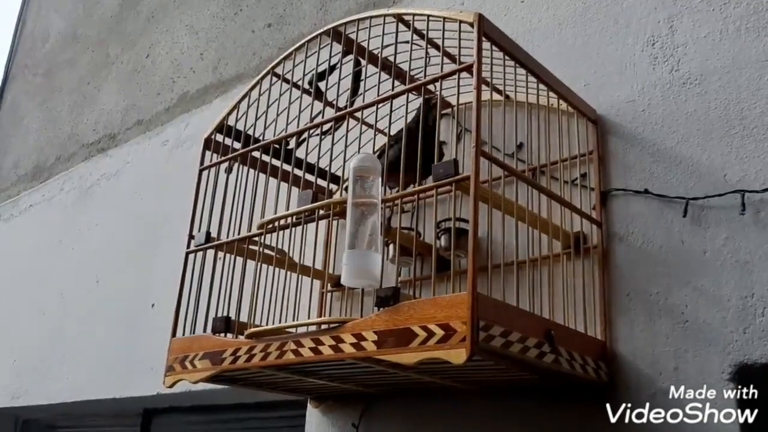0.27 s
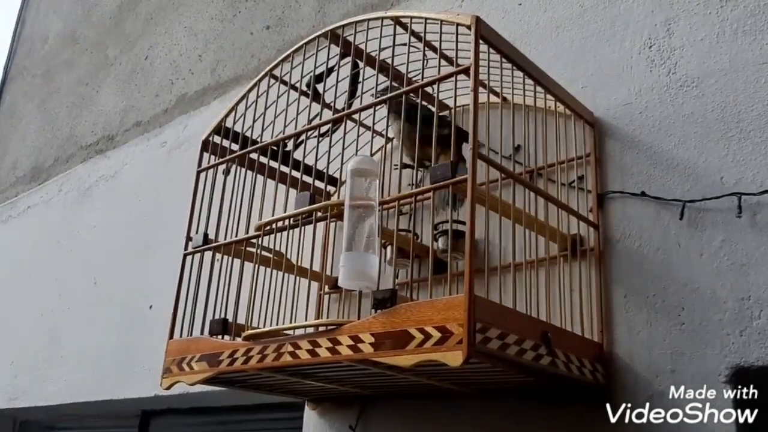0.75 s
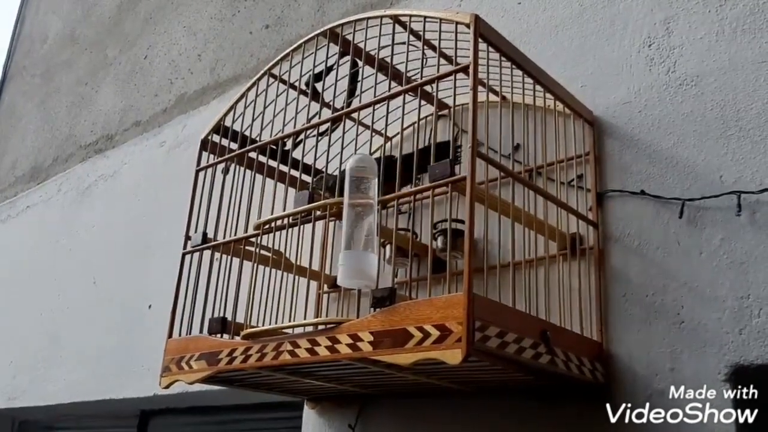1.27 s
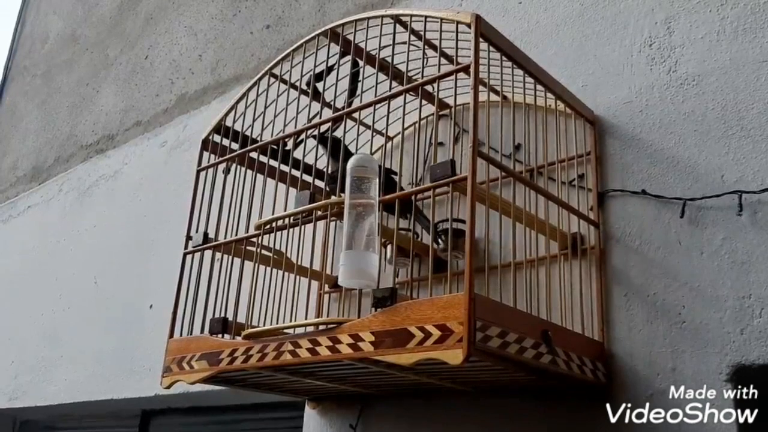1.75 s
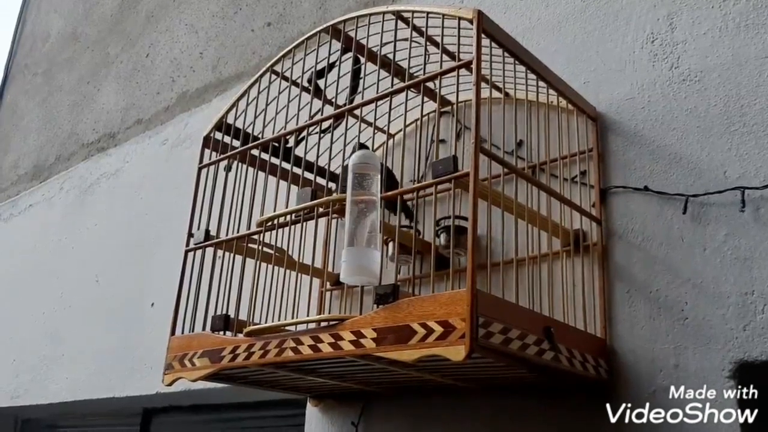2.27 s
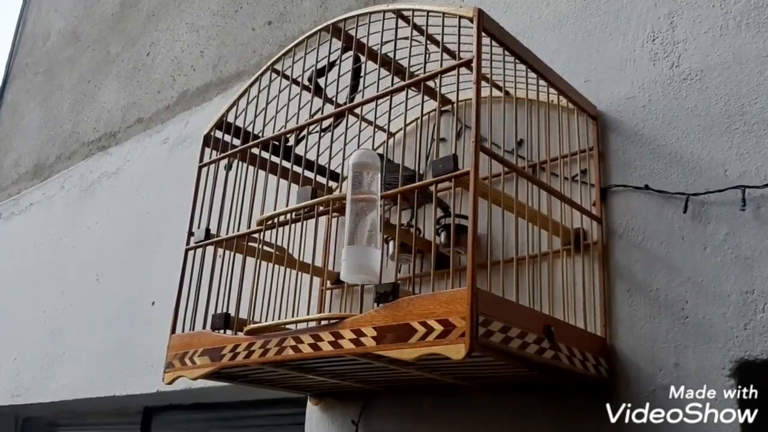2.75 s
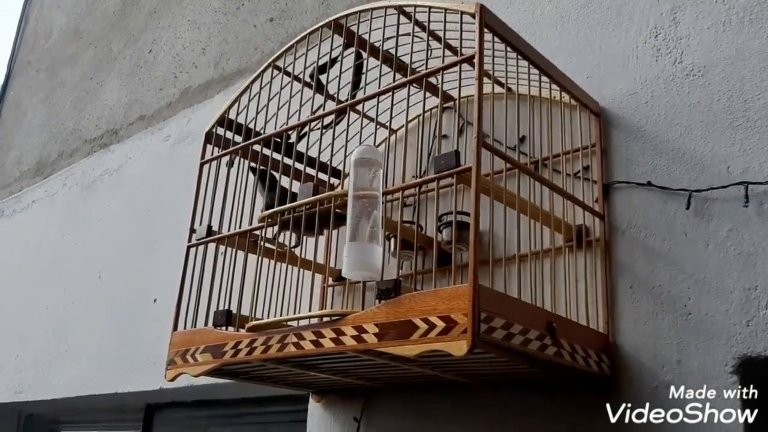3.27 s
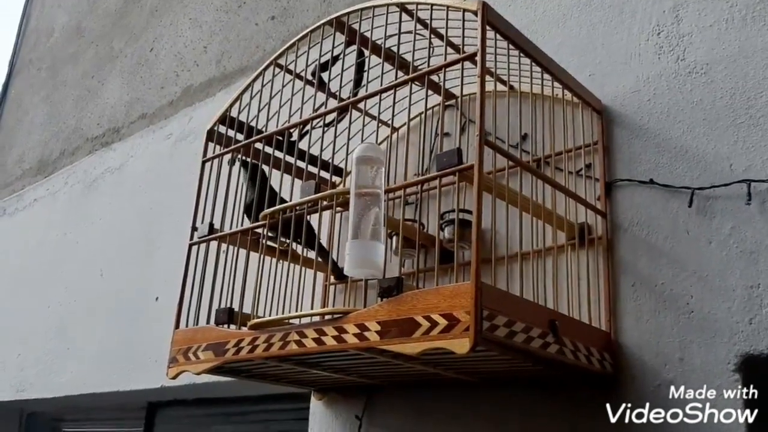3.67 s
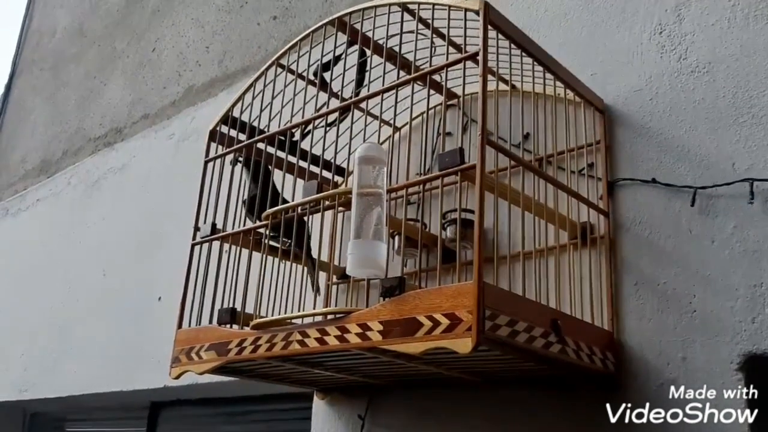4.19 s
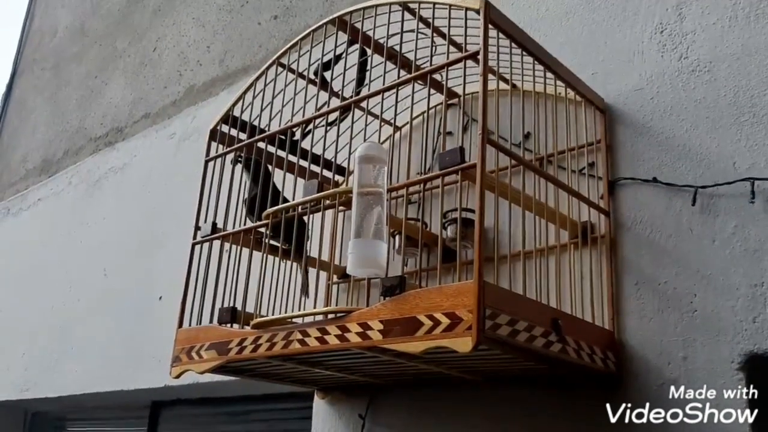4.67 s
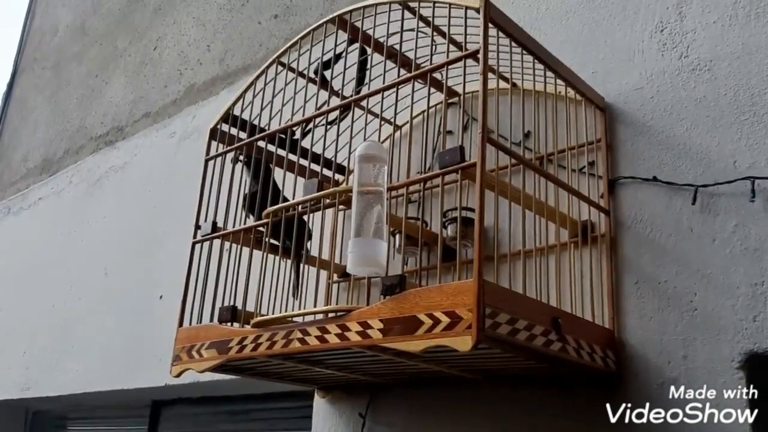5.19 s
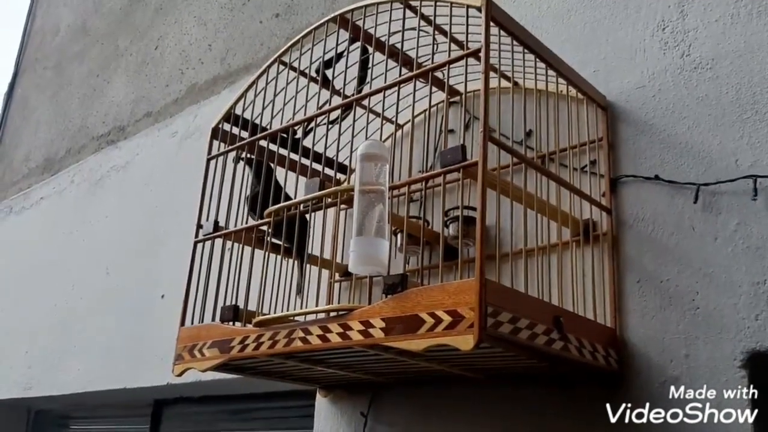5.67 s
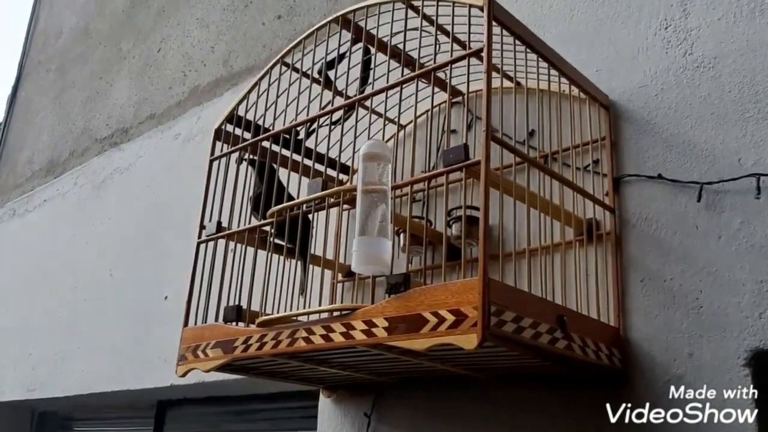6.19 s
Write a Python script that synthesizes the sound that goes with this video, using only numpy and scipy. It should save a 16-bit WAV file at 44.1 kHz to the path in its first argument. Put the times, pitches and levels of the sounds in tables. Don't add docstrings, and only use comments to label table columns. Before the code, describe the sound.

Soft perch scratches and wing flutters, faint chirps from a distant bird, then a close songbird whistles four quick falls and a slow rise.

```python
import sys
import numpy as np
from scipy import signal
from scipy.fft import rfft, irfft
from scipy.io import wavfile
from scipy.ndimage import uniform_filter1d, minimum_filter1d

SR = 44100
rng = np.random.default_rng(int(sys.argv[2]) if len(sys.argv) > 2 else 0)


def digitize_waveform(pressure):
    field = np.atleast_2d(pressure).T
    bounded = np.clip(field, -1, 1)
    quanta = np.round(bounded * 32767).astype(np.int16)
    wavfile.write(sys.argv[1], SR, quanta)


def invert_db(level):
    return 10 ** (np.asarray(level, dtype=float) / 20)


N = 283563
TIME, HZ = np.arange(N) / SR, np.fft.rfftfreq(N, 1 / SR)


def rms_one(x):
    return x / np.sqrt(np.mean(x ** 2) + 1e-20)


def at_hz(points, hz, axis=1):
    points = np.array(points)
    return np.interp(np.log(np.maximum(hz, 1)), np.log(points[:, 0]), points[:, axis])


def drift(rate_hz):
    knots = rng.standard_normal(size=4003)
    return np.interp(TIME * rate_hz, np.arange(knots.size), knots)


def town():
    # f/Hz, density/dB
    spectrum = [(15, -52), (25, -29.5), (48, -25.5), (75, -3), (91, 0.5), (108, -8.5), (165, -4.5),
                (231, -8), (401, -7.5), (574, -12.5), (1290, -16), (1530, -14.5), (2470, -24),
                (6740, -39.5), (7600, -45.5), (9880, -84.5), (16700, -120)]
    # f/Hz, left over right/dB
    balance = [(60, 4), (110, -1), (200, 2.5), (380, 2), (700, 1), (1290, -1.0), (2380, 0.5), (4400, 5),
               (8120, -2), (15000, 2)]
    # f/Hz, common share/1, left lag/rad
    likeness = [(60, 1, .12), (150, 0.94, 0.27), (303.5, 0.95, 0.2), (600, 0.14, 0.19), (900, 0.42, 1.1),
                (1406, 0.43, 3.13), (2790, 0.13, 4.5), (8000, 0.055, 4.7)]
    level_db = -41.5
    common, left, right = rfft(rng.standard_normal((3, N)))
    share = np.clip(at_hz(likeness, HZ), 0, 1)
    late = np.exp(-1j * at_hz(likeness, HZ, axis=2))
    pair = np.array([common * late, common]) * np.sqrt(share)
    pair = pair + np.array([left, right]) * np.sqrt(1 - share)
    colour = invert_db(at_hz(list(spectrum[:-2]) + [(9000, -59), (16000, -68)], HZ))
    sides = invert_db(at_hz(balance, HZ) * np.array([[.5], [-.5]]))
    noise = irfft(pair * colour * sides, N)
    return invert_db(level_db + 0.48 * drift(2)) * noise / np.std(noise.mean(0))


def motor():
    # f/Hz, level/dB
    orders = [(41., -65.5), (82., -48.5), (164., -50.5), (205., -57.5), (410., -59), (1207., -67.5)]
    throb = 1 + .28 * np.sin(2 * np.pi * 6.84 * TIME)
    wander = np.cumsum(1 + .002 * drift(1.5)) / SR
    hum = np.zeros(N)
    for hz, db in orders:
        hum += invert_db(db + 0.99 * drift(1.9)) * np.sin(2 * np.pi * hz * wander + hz)
    return np.sqrt(2) * throb * hum * invert_db([[.6], [-.6]])


def hops():
    # t/s, length/s, perch/dB, feathers/dB, wires/dB
    cage_moves = [(.002, 0.21, -68, -60, -72), (0.061, 0.026, -49, -51, -86), (0.173, .14, -75, -66, -74),
                  (0.28, 0.17, -61, -57, -69), (.366, 0.053, -51, -54, -65),
                  (0.477, 0.05, -44.5, -50.5, -80), (.621, 0.3, -67, -60.5, -85),
                  (0.844, 0.056, -50, -49, -80), (0.952, 0.053, -52, -51, -60),
                  (1.147, 0.13, -70, -56.5, -85), (2.031, .06, -72, -59, -85),
                  (2.507, 0.083, -72, -59, -85), (2.98, 0.066, -68, -59, -85), (3.213, .035, -64, -55, -85),
                  (3.262, 0.032, -66, -59, -70), (3.37, 0.038, -45, -46, -61), (5.971, .12, -75, -65, -90)]
    # centre f/Hz, left over right/dB
    cage_parts = [
        (4200, 1),
        (6100, -0.5),
        (10900, 3),
    ]
    # t/s, peak
    # level/dB, length/s, centre f/Hz, left over right/dB
    ticks = [(.49, -45, .015, 2700, 0), (.37, -43, .0056, 4200, 6), (.505, -64, .04, 11500, .6),
             (.862, -64, .03, 11500, .6), (.96, -64, .02, 13500, 1.5), (1.005, -65, .04, 11500, -3),
             (2.593, -41, .0046, 3500, 16), (2.684, -33, .01, 760, 1.2), (2.685, -37, .012, 1080, -8),
             (3.269, -46, .0043, 4500, 7), (3.376, -49, .007, 3600, -2), (4.437, -47, .012, 6000, 1.2),
             (5.285, -40.5, .055, 2850, 2)]
    out, size = np.zeros((2, N)), 20000
    contacts = []
    for s, length, *levels in cage_moves:
        for db, (hz, pan_db) in zip(levels, cage_parts):
            contacts.append((s, db, length, hz, pan_db))
    for s, peak_db, length, hz, pan_db in contacts + list(ticks):
        grains = np.repeat(rng.exponential(1, size // 50), 50) ** 0.35
        scratch = rng.standard_normal((3, size)) * grains
        t = TIME[:size] / length
        shape = np.minimum(3 * t, 1) * np.exp(-1.5 * t ** 2)
        width = .04 if 11000 < hz < 12200 else .22
        sos = signal.butter(3, [hz * (1 - width), hz * (1 + width)], "band", fs=SR, output="sos")
        burst = rms_one(signal.sosfilt(sos, scratch)) * shape
        pair = 0.43 * burst[0] + 1.1 * burst[1:]
        at = int(s * SR)
        out[:, at:at + size] += invert_db(peak_db - 5) * pair * invert_db([[pan_db / 2], [-pan_db / 2]])
    return out


def voice(rows, edge_s):
    s, *columns = np.transpose(rows)
    span = slice(int(s[0] * SR), int(s[-1] * SR))
    t = TIME[span]
    edge = np.clip(np.minimum(t - t[0], t[-1] - t) / edge_s, 0, 1)
    return span, edge, [np.interp(t, s, c) for c in columns]


def yard(x, echo_db, tail_db):
    echo_t60_s, tail_t60_s = 0.21, 1.35
    t = TIME[:SR]
    sparse = rng.standard_normal((2, SR)) * (rng.random((2, SR)) < 900 / SR)
    echoes = sparse * invert_db(-60 * t / echo_t60_s) * (t > .004)
    tail = rng.standard_normal((2, SR)) * invert_db(-60 * t / tail_t60_s) * (t > .02)
    response = invert_db(echo_db) * rms_one(echoes) + invert_db(tail_db) * rms_one(tail)
    response = signal.lfilter([.8], [1, -.22], response)
    return signal.fftconvolve(x[None], response / np.sqrt(SR), axes=1)[:, :N]


def far_bird():
    # t/s, f/Hz, level/dB
    slur = [(1.08, 2750, -68), (1.098, 3300, -59), (1.125, 3750, -66), (1.2, 3800, -69), (1.33, 3950, -73),
            (1.41, 3950, -71)]
    # t after start/s, f/Hz, relative level/dB
    chirp = [(0, 3055, 2), (.012, 3744, -7), (.023, 3300, 4), (.039, 2770, -6), (.055, 3050, -3),
             (.085, 3093, -14)]
    # t/s, level/dB
    chirp_starts = [
        (1.458, -51),
        (1.563, -55),
        (1.668, -55),
    ]
    waver_hz = [150, 50, 80, 80]
    out, waver, flutter = np.zeros(N), drift(160), drift(60)
    calls = [slur] + [np.add(chirp, (s, 0, db)) for s, db in chirp_starts]
    for rows, depth_hz in zip(calls, waver_hz):
        span, edge, (hz, level_db) = voice(rows, 0.0027)
        phase = 2 * np.pi * np.cumsum(hz + depth_hz * waver[span]) / SR
        level_db = level_db + depth_hz / 40 * flutter[span]
        out[span] += np.sqrt(2) * invert_db(level_db) * edge * np.sin(phase)
    out += invert_db(-.8) * np.roll(out, int(.021 * SR))
    return out * invert_db([[3], [-4]]) + yard(out, echo_db=-4, tail_db=-14)


def note_warble(warbles):
    opening_share, grows_s, stops_s, slowing = .25, .06, .008, 330
    warble = np.zeros(N)
    for start, end, rate, depth_hz in warbles:
        since = TIME - start
        fade = np.minimum(opening_share + since / grows_s, (end - TIME) / stops_s)
        fade = np.clip(fade, 0, 1) * (since > 0)
        warble += depth_hz * fade * np.sin(2 * np.pi * (rate - slowing * since) * since)
    return warble


def song():
    # t/s, f/Hz, level/dB
    whistles = [
        [(3.59, 2837, -65), (3.606, 2830, -22.5), (3.632, 2754, -16), (3.678, 2464, -17.5), (3.746, 2129, -14),
         (3.784, 1925, -10), (3.816, 1740, -17.5), (3.84, 1797, -24.5)],
        [(3.908, 2880, -53), (3.926, 2813, -14), (3.948, 2772, -8.5), (4.016, 2324, -11), (4.09, 1988, -9),
         (4.142, 1718, -14), (4.16, 1700, -38)],
        [(4.228, 3300, -58), (4.25, 3234, -11.5), (4.278, 2693, -7), (4.32, 2293, -10), (4.39, 1961, -9.5),
         (4.44, 1724, -18), (4.447, 1683, -27)],
        [(4.522, 3410, -50.5), (4.54, 3365, -24.5), (4.558, 3274, -10.5), (4.586, 3063, -8.5),
         (4.654, 2808, -7), (4.748, 2250, -13), (4.77, 2167, -35.5)],
        [(4.89, 1356, -55.5), (4.929, 1412, -31), (5.039, 1652, -18), (5.155, 1899, -14.5), (5.209, 2090, -9),
         (5.259, 2225, -9.5), (5.293, 2271, -11.5), (5.338, 2284, -13.5), (5.354, 2275, -27)],
    ]
    # start t/s, end t/s, rate/Hz, depth/Hz
    warbles = [
        (3.597, 3.669, 146.5, 169.6),
        (3.922, 3.994, 132.2, 162),
    ]
    blurs = [.28, .33, .36, .2, .14]
    # air under tone/dB, overtones/dB, low overtones/dB,
    # beak resonance at middle pitch f/Hz, beak lift/dB
    moods = [(-43.5, -5.5, -0.5, 13000, 4.5), (-43, -2, 4.5, 11000, 4.5), (-44, -6, 4.5, 11200, 8.5),
             (-49, -0.7, -2.8, 11500, 15), (-49.5, -4, 2, 10400, 7)]
    # multiple/1, level under fundamental/dB
    overtones = [(2, -41), (3, -49.5), (4, -49), (5, -46.5), (6, -49), (7, -47.5), (8, -48), (9, -50.5),
                 (10, -47)]
    # f/Hz, level/dB
    beak_colour = [(2700, 28.5), (3050, 8), (3400, 1.5), (3800, -11), (4500, 5), (5200, -0.5), (6000, -2.5),
                   (7000, 8), (8200, 1.5), (9500, 3), (11000, -1), (12200, 6.5), (14300, -0.5),
                   (15700, -5.5)]
    middle_hz, beak_follows, lift_db_per_octave = 2520, 1.95, -2.5
    high_db_per_octave = -7
    full_db, soft_air, soft_low = -8, .15, 0.22
    out, tremor, wobble = np.zeros((2, N)), drift(55), drift(300)
    warble = note_warble(warbles)
    air_colour = invert_db(at_hz(beak_colour, HZ)) * (HZ > 3500)
    air = rms_one(irfft(rfft(rng.standard_normal((2, N))) * air_colour, N))
    unsteady = [2.5 * drift(22) + 4 * drift(450) for row in overtones]
    for rows, (air_db, more_db, low_db, beak_hz, beak_db), blur in zip(whistles, moods, blurs):
        span, edge, (glide_hz, level_db) = voice(rows, 0.0025)
        soft_db = full_db - level_db
        beak_hz = beak_hz + beak_follows * (glide_hz - middle_hz)
        beak_db = beak_db + lift_db_per_octave * np.log2(glide_hz / middle_hz)
        hz = uniform_filter1d(glide_hz, size=500) + warble[span] + 6 * tremor[span]
        phase = 2 * np.pi * np.cumsum(hz) / SR
        tone = np.sin(phase) + invert_db(air_db + soft_air * soft_db) * air[:, span]
        for (k, under_db), chance in zip(overtones, unsteady):
            lift_db = beak_db * np.exp(-((k * hz - beak_hz) / 1500) ** 2)
            lift_db += high_db_per_octave * np.log2(hz / middle_hz) / (1 + (7500 / k / hz) ** 8)
            lift_db += (low_db + soft_low * soft_db) / (1 + (k * hz / 7500) ** 8)
            gain = invert_db(under_db + more_db + lift_db + at_hz(beak_colour, k * hz) + chance[span])
            overtone = np.sin(k * (phase + blur * wobble[span]) + k * k)
            tone += gain * (k * hz < .4 * SR) * overtone
        out[:, span] += np.sqrt(2) * invert_db(uniform_filter1d(level_db, size=200)) * edge * tone
    return out


def at_ports(x):
    # f/Hz, left over right/dB, left lead/rad
    wall = [(1350, 3, -0.15), (1670, -3.5, 0.54), (1950, -2.5, 1.4), (1860, 1.5, 0.8), (2050, -6, 0.019),
            (2268, 2.5, -1.3), (2446, 9.5, 0.24), (2720, 25, 1.4), (2863, 5.5, 0.67), (3300, 0, 1.6),
            (5050, 3.5, 1.8), (8980, -1, 0.97), (13000, 3, 1.2)]
    ratio = invert_db(at_hz(wall, HZ)) * np.exp(1j * at_hz(wall, HZ, axis=2))
    right = 2 / np.abs(1 + ratio) * np.exp(-.5j * np.angle(ratio))
    return irfft(rfft(x) * np.array([right * ratio, right]), N)


def scene():
    gain_db, duck_db, duck_middle_s, duck_spread_s = -1.18, -6, 4.36, .17
    background_db = gain_db + duck_db / (1 + np.exp((duck_middle_s - TIME) / duck_spread_s))
    background = (town() + motor()) * invert_db(background_db)
    bird = song()
    near_song = at_ports(bird) + yard(bird.mean(0), echo_db=-9, tail_db=-32)
    return background + hops() + far_bird() + near_song


def limiter(x):
    room = np.minimum(1, .99 / np.maximum(np.abs(x), 1e-9))
    return x * uniform_filter1d(minimum_filter1d(room, size=400), size=400)


def drop_weak_bands(x):
    # f/Hz, level per bin/dB
    floor = [(3000, -130), (7500, -130), (7700, -99), (8100, -99), (9500, -105), (16000, -108)]
    mask_db = 53.5
    hz, t, z = signal.stft(x, SR, nperseg=2048, noverlap=1024)
    bands = z[:, :1024].reshape(2, 64, 16, -1)
    level = 10 * np.log10(np.mean(np.abs(bands) ** 2, axis=(0, 2)) + 1e-20)
    centre = hz[8:1024:16, None]
    chance_db = 9 * uniform_filter1d(rng.standard_normal(level.shape), size=4)
    masked = level.max(0) - mask_db + chance_db
    kept = (level > np.maximum(at_hz(floor, centre), masked)) | (centre < 3000)
    z[:, :1024] = (bands * np.where(kept, 1, .02)[None, :, None]).reshape(2, 1024, -1)
    return signal.istft(z, SR, nperseg=2048, noverlap=1024)[1][:, :N]


def top_cut(x):
    return signal.sosfilt(signal.butter(12, 15680, fs=SR, output="sos"), x)


def record(dry):
    mix = drop_weak_bands(limiter(dry))
    return top_cut(mix)


dry = scene()
out = record(dry)
digitize_waveform(out)
```